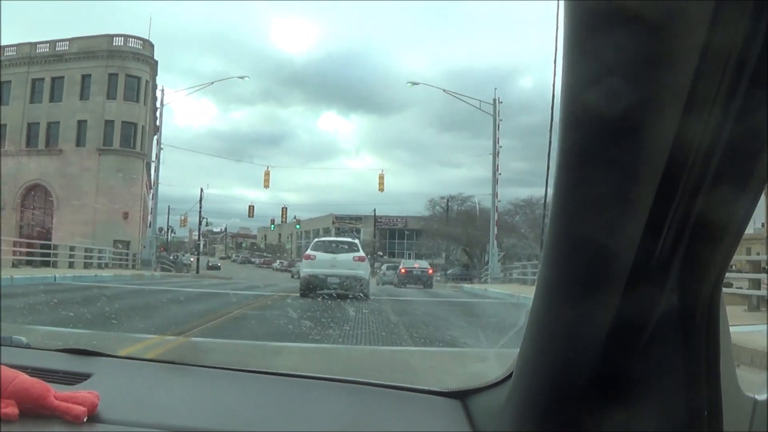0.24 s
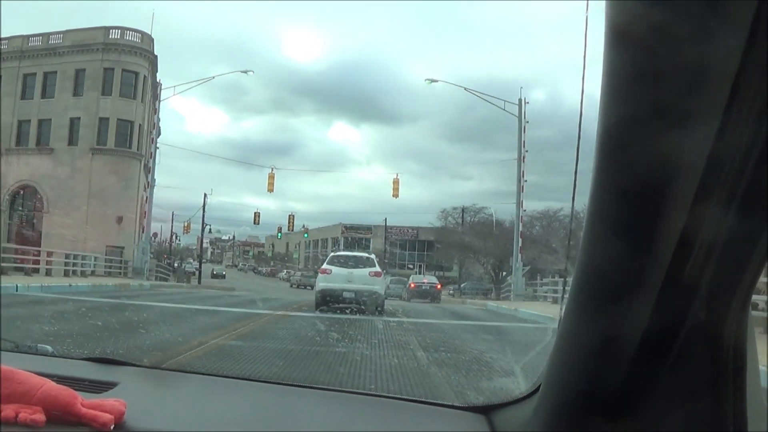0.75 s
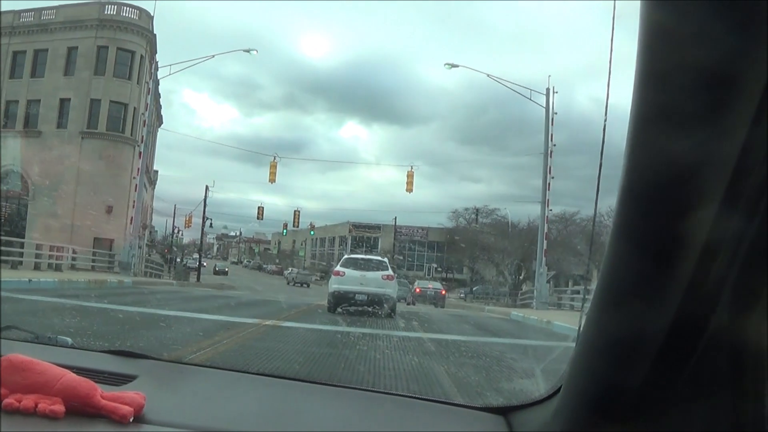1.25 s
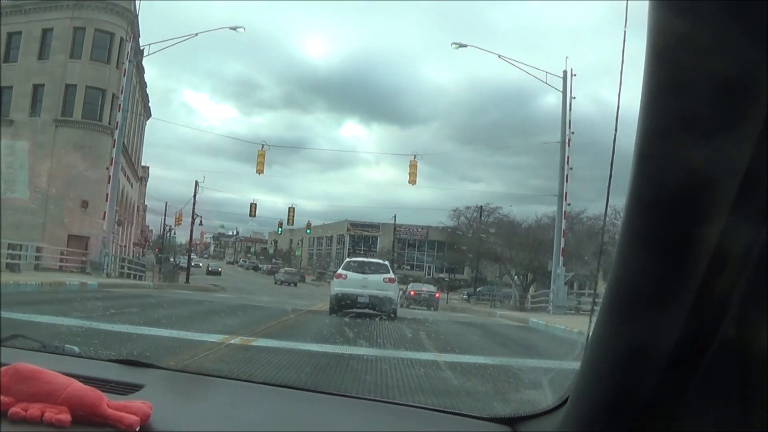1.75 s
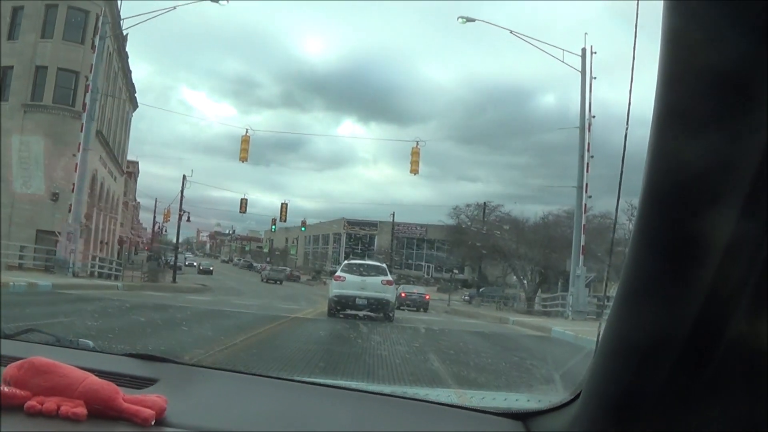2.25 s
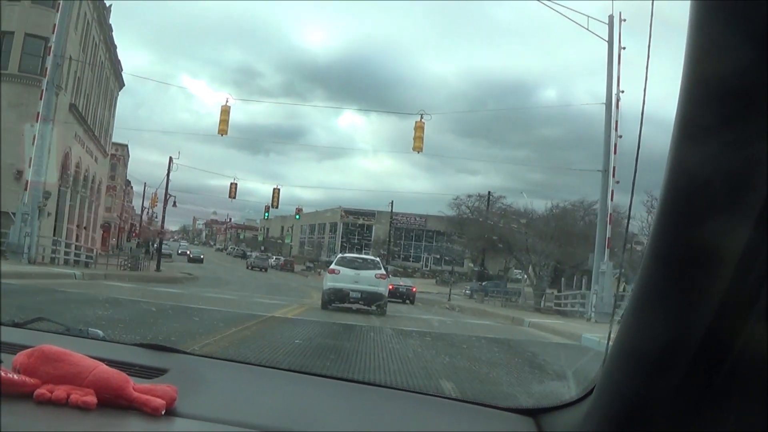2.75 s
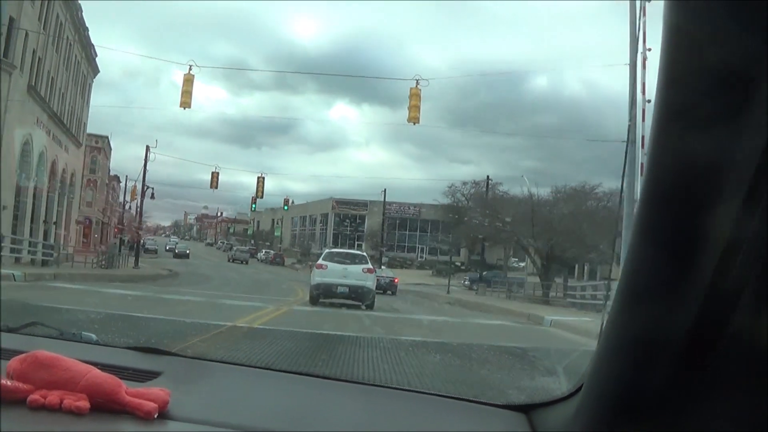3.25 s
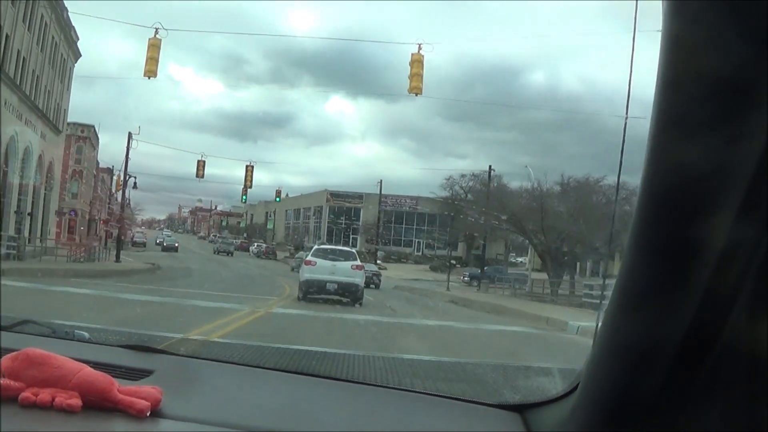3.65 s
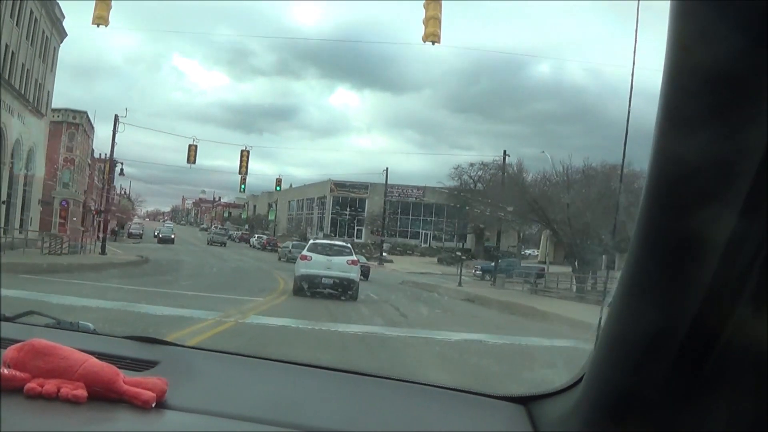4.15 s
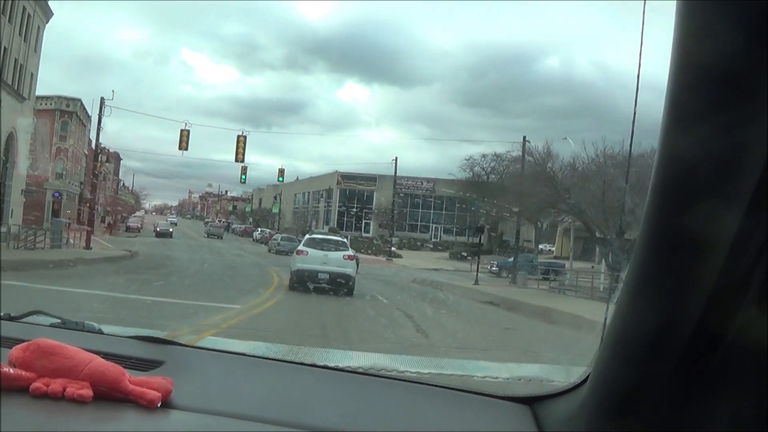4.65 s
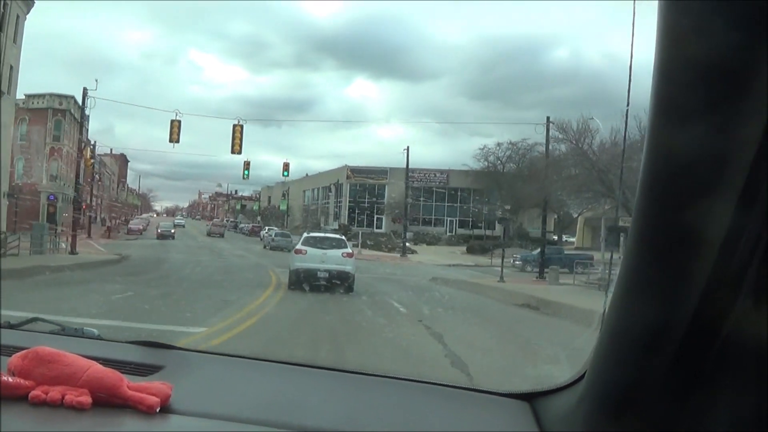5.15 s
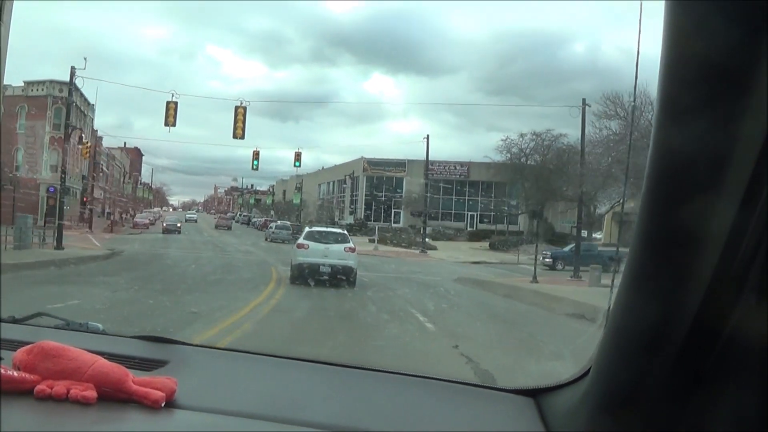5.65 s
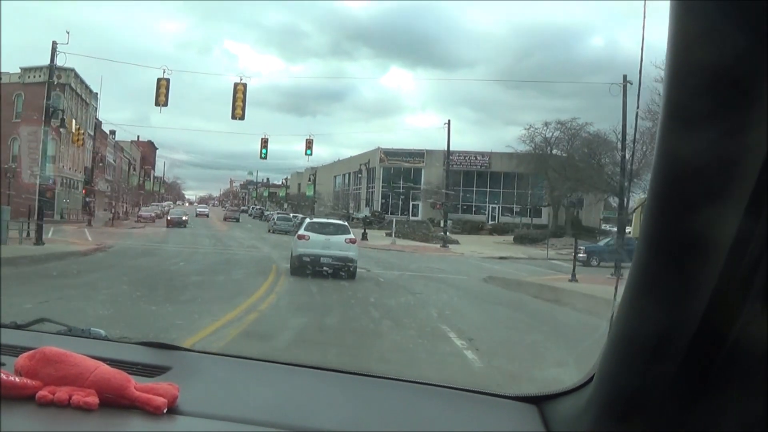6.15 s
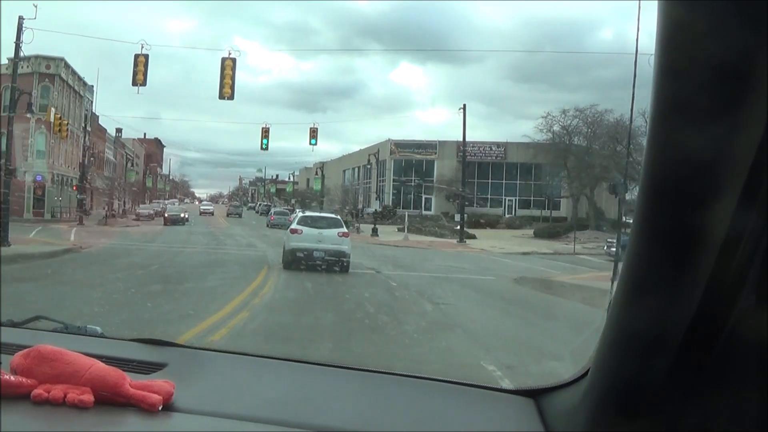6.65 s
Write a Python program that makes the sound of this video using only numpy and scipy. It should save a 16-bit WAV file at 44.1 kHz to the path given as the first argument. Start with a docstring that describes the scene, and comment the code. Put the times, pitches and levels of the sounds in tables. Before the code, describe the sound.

Inside a car driving slowly along a town street, uneven low boom, drumming floor and muffled tyre roar dominate. A low engine hum climbs gradually, then drops after five seconds. Soft thumps cluster in the first two seconds and the last two. Loose dashboard plastic ticks and chatters, densest mid-way. A camera's stereo microphones in the cabin add faint hiss and a very high, thin, throbbing whine.

```python
"""Inside a car rolling slowly through town: the road shakes the body into a boom, a drumming floor and tyre
roar. All three are shaped noise; the engine hums in three wavering sines, the tyres add a faint whine, and
bumps ring panels. Two loose pieces of trim rattle as struck sets of modes, among noise clicks, thumps and rough
little chirps. A camera microphone pair spreads the sound; over it lie hiss and a thin high whine at 15.7 kHz
that buzzes at 60 Hz, and one hears that whine throb about 13 times a second."""
import sys
import numpy as np
from scipy import signal
from scipy.fft import rfft, irfft, next_fast_len
from scipy.io import wavfile

SR = 44100
rng = np.random.default_rng(int(sys.argv[2]) if len(sys.argv) > 2 else 0)


def bounce(signal):
    """Save signal as a 16-bit WAV file at the path given by the first command-line argument."""
    frames = np.transpose(np.atleast_2d(signal))
    limited = np.clip(frames, -1, 1)
    pcm = np.round(limited * 32767).astype(np.int16)
    wavfile.write(sys.argv[1], SR, pcm)


N = 304731

# The engine's pull. Each row: time in seconds, firing rate in Hz, load (level of the first order) in dB,
# second order in dB over the first.
ENGINE_LOAD = [(0, 42.3, -26, -1), (.3, 42.3, -30, -11), (.48, 43.7, -15, -4.5), (.65, 45.16, -40, -14),
               (.9, 46.03, -22, -8), (1.75, 48.84, -34, 2.5), (2.06, 53.24, -12, -17),
               (2.17, 54.34, -26, 0), (2.27, 55.1, -12, -8), (2.4, 55.36, -22.5, -18),
               (2.54, 55.76, -13.5, -11.5), (2.65, 55.97, -24.5, -4), (2.73, 56.1, -17.5, -7),
               (2.96, 56.5, -27, -0.5), (3.12, 57.3, -14.5, -8.5), (3.33, 58.4, -27.5, 1),
               (3.42, 58.26, -19, -7.5), (3.54, 58.86, -16.5, -8), (3.72, 59.47, -29, 2.5),
               (3.88, 59.66, -18.5, -10), (4.0, 59.8, -18.5, -7), (4.1, 60.28, -26.5, 1),
               (4.2, 60.6, -26.5, 10), (4.45, 61.2, -24, 1.5), (4.65, 60.5, -21.5, -4),
               (4.8, 61.8, -26.5, 11), (4.9, 61.5, -36, 10), (5.05, 62.13, -23, 9), (5.19, 62.46, -31, 12),
               (5.3, 54.94, -34, -1.5), (5.75, 48.05, -35, -2), (6.0, 48.2, -18, -7.5), (6.5, 47, -44, -11),
               (6.91, 43.6, -47, -4)]


def amp(db):
    """dB to gain."""
    return 10 ** (np.asarray(db) / 20)


def rms_one(x):
    """Scale to rms 1."""
    return x / np.sqrt(np.mean(x ** 2) + 1e-20)


def in_time(rows):
    """Columns of a curve drawn over time, one value a sample."""
    s, *columns = np.transpose(rows)
    return [np.interp(np.arange(N) / SR, s, column) for column in columns]


def at_hz(points, hz, column=1):
    """A curve over frequency, read on a log-frequency axis."""
    points = np.array(points)
    return np.interp(np.log(hz + 1), np.log(points[:, 0]), points[:, column])


def drift(rate_hz):
    """Slow random wander of rms 1: noise through two equal low-pass poles at rate_hz."""
    step = 40  # computed at a fortieth of the sample rate
    r = np.exp(-2 * np.pi * rate_hz * step / SR)
    noise = rng.standard_normal(N // step + 2002)
    slow = signal.lfilter([1], [1, -2 * r, r * r], noise)[2000:]  # drop the filter's start
    return np.interp(np.arange(N) / step, np.arange(len(slow)), rms_one(slow))


def coloured(spectrum, peaks=()):
    """Two unrelated noises of one colour, with resonances added in power; rms 1."""
    hz = np.fft.rfftfreq(N, 1 / SR)
    power = amp(at_hz(spectrum, hz)) ** 2
    for centre_hz, width_hz, db in peaks:
        power = power + amp(db) ** 2 / (1 + (2 * (hz - centre_hz) / width_hz) ** 2) ** 2
    noise = rng.standard_normal((2, N))
    return rms_one(irfft(rfft(noise) * np.sqrt(power), N))


def ring(pulses, hz, t60):
    """A two-pole resonator: a unit pulse sets a sine of height 1 ringing, 60 dB down after t60 seconds."""
    r, w = amp(-60 / (t60 * SR)), 2 * np.pi * hz / SR
    return signal.lfilter([0, np.sin(w)], [1, -2 * r * np.cos(w), r * r], pulses + 1e-18)


def struck(hits, modes, lag_s, swell_s, spread_db, level_db, crack_db, crack_hz, cycles, scatter_s):
    """Every hit rings all modes, each swelling in, and cracks; bending waves bring low modes later."""
    s, peak_db = np.transpose(hits)
    strength, late = rng.standard_normal((2, len(hits), len(modes)))
    out = np.zeros(N)
    for k, (hz, db, t60, *slow_swell) in enumerate(modes):
        # the delay is half lag_s at 1 kHz and nothing at 4 kHz, give or take scatter_s
        arrival = s + lag_s * (np.sqrt(1000 / hz) - .5) + scatter_s * late[:, k]
        at = np.clip(arrival * SR, 0, N - 1).astype(int)
        pulses = np.zeros(N)
        pulses[at] = amp(peak_db + db + level_db + spread_db * strength[:, k]) * (-1) ** k
        # a short ring taken from a long one gives a soft onset
        swell_t60 = max([swell_s * 1000 / hz, *slow_swell])
        out += ring(pulses, hz, min(t60, cycles / hz)) - ring(pulses, hz, swell_t60)
    # the contact itself cracks: broad noise that dies in about 10 ms and grows faster than the blow
    pulses = np.zeros(N)
    pulses[(s * SR).astype(int)] = amp(1.38 * (peak_db + 26) + crack_db)
    fade = signal.lfilter([1], [1, -np.exp(-1 / (0.0096 * SR))], pulses + 1e-18)
    band = signal.butter(2, [crack_hz / 3, crack_hz * 1.8], "band", fs=SR, output="sos")
    return out + fade * rms_one(signal.sosfilt(band, rng.standard_normal(N)))


def road():
    """Rough tarmac drives the boom, the floor pan with its panels, and the tread roar; all surge unevenly."""
    # Road excitation. Each row: time in seconds, boom, floor pan and tyre roar levels in dB.
    excitation = [(0.0, -27.5, -25.5, -33.5), (0.5, -21.5, -20.5, -32.5), (0.67, -37, -19, -32),
                  (0.79, -21, -15, -33), (0.85, -19, -22.5, -33.5), (1.23, -27, -20.5, -33.5),
                  (1.29, -20, -25.5, -35), (1.44, -18, -21.5, -33), (1.73, -18, -17, -31.5),
                  (1.81, -42, -14.5, -30.5), (1.96, -16.5, -18, -32.5), (2.23, -29, -20.5, -32.5),
                  (3.31, -18, -21, -33.5), (3.5, -34, -21.5, -33.5), (3.56, -21, -18, -32.5),
                  (4.0, -20, -20, -32), (4.22, -23.5, -19, -34), (4.85, -18.5, -21.5, -33.5),
                  (4.98, -28, -18.5, -35), (5.1, -32, -30, -38), (5.24, -16, -19.5, -32.5),
                  (5.37, -21.5, -29, -37), (5.74, -20, -22, -33.5), (6.16, -27, -21.5, -34.5),
                  (6.24, -26.5, -23, -32), (6.27, -26, -18, -33), (6.33, -30, -27, -37),
                  (6.76, -27.5, -27.5, -36.5), (6.89, -27, -14.5, -27.5), (6.91, -40, -26.5, -32)]
    # Suspension and cabin boom, drumming floor, tread roar through the body.
    # Each row: frequency in Hz, relative level per Hz in dB.
    boom_colour = [(8.8, -48), (15, -12), (38, 5), (70, -3.5), (120, -12), (160, -53), (260, -120)]
    pan_colour = [(32, -33), (55, -2), (108, 2), (157, -4.5), (175, -1.5), (200, -4.5), (320, -16),
                  (420, -41), (700, -120)]
    tyre_colour = [(120, -63), (200, -8), (334, -11), (513, -12.5), (603, -17), (790, -16), (1060, -26),
                   (1180, -26), (1870, -36), (2420, -37), (5000, -63.5), (6500, -83), (11000, -120)]
    # Slow body mode added to the boom, then panel modes added to the floor pan.
    # Each row: centre in Hz, width in Hz, level in dB on the scale of that colour.
    body_bounce = [(26.5, 11, 7)]
    panels = [(86, 11, 0.5), (152.7, 14.7, 3.5), (175, 3.6, 1.5)]
    lumps_db = 1.5  # random surges of each layer
    boom_db, pan_db, tyre_db = in_time(excitation)
    surge = drift(5.4)
    boom = amp(boom_db + lumps_db * drift(3.2)) * coloured(boom_colour, body_bounce)
    pan = amp(pan_db + lumps_db * surge) * coloured(pan_colour, panels)
    # the roar shares a little of the floor's surge
    tyres = amp(tyre_db + lumps_db * (0.13 * surge + drift(21.0))) * coloured(tyre_colour)
    return boom + pan + tyres


def engine():
    """The first three orders of the firing rate as sines that waver in level and together in pitch."""
    third_db = -10.5  # over the first order
    waver_db, waver_hz, speed_waver = 2.0, 7.0, .008
    firing_hz, load_db, second_db = in_time(ENGINE_LOAD)
    turn = 2 * np.pi * np.cumsum(firing_hz * (1 + speed_waver * drift(3.68))) / SR
    hum = np.zeros(N)
    for order, db in enumerate([0, second_db, third_db], start=1):
        tone = amp(waver_db * drift(waver_hz)) * np.sin(order * turn)
        hum += amp(load_db + db) * rms_one(tone)
    return hum


def tyre_whine():
    """The tyres' faint whine: a sine that glides and flutters in pitch and wavers in level."""
    # Each row: time in seconds, pitch in Hz, level in dB.
    glide = [(.5, 1160, -61), (.8, 1151, -53), (1.3, 1138, -51), (1.6, 1159, -50), (2.0, 1160, -89),
             (2.4, 1232, -60), (2.9, 1211, -70)]
    waver_db = 3.0
    whine_hz, whine_db = in_time(glide)
    phase = 2 * np.pi * np.cumsum(whine_hz * (1 + 0.0026 * drift(28))) / SR
    return amp(whine_db + waver_db * drift(15)) * np.sin(phase)


def bumps():
    """Each bump is a soft push: one body panel swells in over about a cycle and dies away."""
    # Each row: start in seconds, level in dB, panel pitch in Hz.
    pushes = [(0.371, -14, 111), (.405, -16, 43.8), (.44, -25, 80.6), (0.541, -16, 175),
              (0.595, -2.5, 154.6), (.69, -10, 138.5), (0.764, -5, 77.5), (.84, -11, 42), (.93, -10, 54.6),
              (1.11, -12.5, 128), (1.19, -10, 47.7), (1.22, -18, 89.6), (1.574, -9, 161),
              (1.762, -17, 203.6), (1.799, -16, 105.3), (1.9, -11.5, 83), (3.12, -15.5, 183),
              (3.56, -16, 188), (5.19, -7.5, 39.27), (5.202, -8.5, 84.6), (5.623, -7, 169.5),
              (5.699, -11, 180), (5.725, -14, 143), (5.86, -6, 48), (5.96, -8.5, 113.4),
              (5.999, -10, 170.9), (6.235, -7, 45.5), (6.244, -10.5, 104), (6.829, -14.5, 145.6),
              (6.874, -15.5, 221.4)]
    t60_s = 0.28
    out, t = np.zeros(N + SR), np.arange(SR // 2) / SR
    for s, db, hz in pushes:
        shape = (1 - np.exp(-t * hz / 0.9)) * amp(-60 * t / t60_s)
        out[int(s * SR):][:len(t)] += amp(db) * shape * np.sin(2 * np.pi * hz * t)
    return out[:N]


def chatter():
    """Faint random taps of the trim, denser under engine load, as rows of seconds and dB."""
    full_load_per_s, level_db, spread_db = 20, -47, 1.5
    load_db = in_time(ENGINE_LOAD)[1]
    chance = full_load_per_s * amp(load_db - load_db.max()) / SR
    at = np.flatnonzero(rng.random(N) < chance)
    return list(zip(at / SR, level_db + spread_db * rng.standard_normal(len(at))))


def dashboard_trim():
    """Loose trim taps and chatters; foam behind it stops every mode within 90 cycles."""
    # Each row: time in seconds, strength of the tap in dB.
    taps = [(0.0543, -29), (0.0957, -32), (0.1221, -38.5), (0.1476, -43), (0.2897, -37), (0.447, -30),
            (0.6906, -47), (0.864, -26.5), (0.8899, -32), (0.9752, -41), (1.0281, -33), (1.052, -35),
            (1.0964, -46), (1.2057, -39), (1.2585, -34), (1.3946, -32), (1.4172, -35), (1.4418, -33),
            (1.4671, -41), (1.5209, -47), (1.5849, -27.5), (1.6118, -23.5), (1.7784, -31.5),
            (1.8306, -32.5), (1.8647, -40), (1.8861, -30.5), (1.9066, -28.5), (1.9829, -23), (2.0034, -36),
            (2.0355, -22), (2.0567, -28), (2.0748, -32), (2.105, -40), (2.1259, -29.5), (2.149, -33),
            (2.1796, -27.5), (2.2024, -29.5), (2.2576, -33), (2.2922, -30.5), (2.3064, -33.5),
            (2.329, -30.5), (2.3431, -34), (2.3584, -37), (2.383, -29), (2.397, -29), (2.4309, -30.5),
            (2.4558, -27), (2.4674, -32.5), (2.488, -38), (2.5052, -36), (2.5229, -31.5), (2.5453, -35),
            (2.5577, -31), (2.591, -40), (2.615, -28.5), (2.6314, -33), (2.6632, -37), (2.6843, -34),
            (2.6974, -36), (2.7666, -42), (2.7891, -36), (2.8403, -32), (2.8524, -41), (2.9071, -31.5),
            (2.9294, -46), (2.9617, -42), (3.039, -36), (3.0622, -42), (3.0894, -44), (3.1103, -46),
            (3.1293, -46), (3.1986, -30.5), (3.2294, -33.5), (3.2625, -37), (3.3263, -39), (3.3685, -46),
            (3.4131, -33), (3.4319, -37), (3.483, -37.5), (3.5359, -29), (3.5673, -33.5), (3.5872, -43),
            (3.6217, -28), (3.6322, -34), (3.686, -29.5), (3.7369, -33.5), (3.7871, -42), (3.8402, -33),
            (3.913, -28.5), (3.9429, -47), (3.9775, -32), (3.9958, -33.5), (4.0084, -34), (4.0267, -40),
            (4.0455, -29.5), (4.0613, -32), (4.0947, -32), (4.144, -34), (4.2288, -31.5), (4.2547, -36.5),
            (4.2786, -36.5), (4.3435, -47), (4.3705, -30.5), (4.3964, -31.5), (4.4268, -50), (4.4493, -42),
            (4.4806, -25.5), (4.5428, -34), (4.5585, -33.5), (4.5735, -43), (4.6272, -26), (4.6571, -33.5),
            (4.7066, -29), (4.7204, -43), (4.776, -41), (4.8065, -27.5), (4.8509, -38), (4.8688, -34.5),
            (4.8973, -36.5), (4.9297, -24.5), (4.9979, -38.5), (5.0291, -28), (5.0739, -42.5),
            (5.3028, -34.5), (5.3323, -41), (5.4126, -43), (5.5692, -36.5), (5.8411, -36), (5.8641, -33.5),
            (5.9589, -27), (6.0701, -47), (6.318, -31), (6.3458, -31.5)]
    # Each row: mode in Hz, relative level in dB, t60 in seconds,
    # and for one that swells in slowly the t60 of the swell in seconds.
    modes = [(748, 5.8, 0.034), (996, -0.5, 0.02), (1203, 1.5, 0.031), (1433, -4, 0.037),
             (1794, -2.5, 0.02), (2030, -0.5, 0.028), (2366, -2.5, 0.022), (2610, -2, 0.019),
             (2990, -8, 0.02), (3000, -13.5, 0.017), (3640, 1.77, .028, .015), (3600, -32, 0.025),
             (3000, -16.5, 0.019), (4850, -39, .02), (5660, -36, .02), (5770, -30, .02)]
    return struck(taps + chatter(), modes, lag_s=0.0043, swell_s=0.004, spread_db=1.5, level_db=-3,
                  crack_db=-42.5, crack_hz=2220, cycles=90, scatter_s=.00003)


def loose_part():
    """A hollower loose part knocks; damping stops its modes within 60 cycles."""
    # Each row: time in seconds, strength of the knock in dB.
    knocks = [(.5182, -30.5), (.605, -33.5), (.9822, -40), (1.6873, -33.5), (2.7261, -43), (2.8154, -43),
              (3.2879, -32.5), (3.4622, -40.5), (3.5573, -42), (5.2727, -40.5), (5.6359, -43),
              (5.7205, -40), (5.8175, -37), (5.9051, -36.5), (5.9959, -31), (6.0891, -39.5), (6.1796, -37)]
    # Each row: mode in Hz, relative level in dB, t60 in seconds.
    modes = [(589, 7.5, 0.034), (779, -12, 0.088), (943, -3, 0.035), (1223, 2, 0.017), (1307, -2.5, 0.076),
             (1618, -8, 0.048), (1927, -10.5, 0.094), (2053, -10.5, 0.071), (2270, -15, 0.044),
             (2740, -18, 0.06), (2940, -25.5, 0.085), (3670, -36, 0.026), (3890, -31, 0.032),
             (4660, -20.5, 0.09), (5030, -23, 0.019), (5550, -24, 0.054), (6380, -27, 0.09)]
    return struck(knocks, modes, lag_s=0.00327, swell_s=0.014, spread_db=0.0, level_db=12.5,
                  crack_db=-32.5, crack_hz=2200, cycles=60, scatter_s=.0003)


def clicks():
    """Dry clicks, scrapes and thumps: short bursts of band-passed noise, the lower ones dying more slowly."""
    # Each row: start in seconds, level in dB, centre in Hz, width in octaves.
    bursts = [(0.051, -33, 5930, 0.74), (.094, -36, 2260, 0.34), (.398, -23, 386, 1.1),
              (.401, -46, 1760, 0.65), (0.416, -29.5, 2240, 0.33), (.465, -42, 5500, 1.2),
              (.822, -44, 4900, .58), (1.539, -39, 1592, 0.24), (1.557, -25.5, 328, 0.9),
              (1.607, -23, 396, 1.9), (1.76, -27.5, 552, 0.49), (1.849, -31, 475, .7),
              (1.869, -24.5, 330, 0.97), (3.291, -38, 8040, 1.5), (3.648, -34, 1900, 0.9),
              (3.655, -38, 2290, 0.61), (3.6626, -32.5, 2440, 0.71), (5.225, -40, 5820, 1.3),
              (5.259, -34.5, 6380, 1.6), (5.622, -25, 630, 0.98), (5.639, -30, 500, .8),
              (5.903, -23, 328, 1.44), (6.241, -32.5, 5360, 1.5), (6.267, -38, 5810, 0.82),
              (6.724, -43, 3500, 1.5), (6.823, -46, 1170, 3.4), (6.833, -26, 320, 1.3),
              (6.854, -40, 1936, 0.79), (6.877, -30, 1790, 1.2), (6.877, -20.5, 364, 1.14),
              (6.905, -26, 2360, 0.51)]
    t60_at_1khz_s, t60_slope, longest_t60_s = 0.099, -1.01, 0.13
    out, t = np.zeros(N + 4096), np.arange(4096) / SR
    for s, db, hz, octaves in bursts:
        half_width = 2 ** (octaves / 2)
        edges_hz = [hz / half_width, min(hz * half_width, 15500)]
        band = signal.butter(2, edges_hz, "band", fs=SR, output="sos")
        noise = rms_one(signal.sosfilt(band, rng.standard_normal(4096)))
        t60_s = min(t60_at_1khz_s * (hz / 1000) ** t60_slope, longest_t60_s)
        shape = np.minimum(t / 0.002, 1) * amp(-60 * t / t60_s)
        out[int(s * SR):][:4096] += amp(db) * shape * noise
    return out[:N]


def chirps():
    """Brief high notes, roughened by a random walk of phase, in even runs that swell towards the middle."""
    # Each row: start in seconds, length of the run in seconds, level in dB, pitch in Hz.
    runs = [(0.249, 0.022, -47, 7470), (0.903, 0.16, -49, 8000), (5.346, 0.29, -46, 7450),
            (6.107, 0.064, -46, 7700)]
    every_s, spread_hz = .0458, 110
    out, t = np.zeros(N + 2048), np.arange(2048) / SR
    shape = t / 0.0074 * np.exp(1 - t / 0.0029)
    for start, length, db, hz in runs:
        count = int(round(length / every_s)) + 1
        for k, swell in enumerate(np.hanning(count + 2)[1:-1]):
            noise = rng.standard_normal(2048)
            note_hz = hz + spread_hz * noise[0]
            note = np.sin(2 * np.pi * note_hz * t + 0.09 * np.cumsum(noise))
            out[int((start + k * every_s) * SR):][:2048] += amp(db) * swell * shape * note
    return out[:N]


def cabin(x):
    """Dense short reflections off glass and seats: decaying noise, an unrelated pattern for each side."""
    t60_s, level_db = 0.085, -8
    t = np.arange(int(.12 * SR)) / SR
    fade = amp(-60 * t / t60_s) * np.minimum(t / 0.00099, 1)
    echoes = rng.standard_normal((2, len(t))) * fade
    echoes /= np.sqrt(np.sum(echoes ** 2, axis=1, keepdims=True))
    return amp(level_db) * signal.fftconvolve(x[None], echoes, axes=1)[:, :N]


def hiss_gain():
    """The moving level of the hiss, as a gain."""
    # Each row: time in seconds, level in dB.
    levels = [(0, -57), (1.38, -57.5), (1.81, -54.5), (2.02, -61), (4.39, -60.5), (6.25, -59), (6.72, -60),
              (6.91, -53.5)]
    return amp(in_time(levels)[0])


def hiss():
    """Two unrelated steady noises, brightest around 3 kHz."""
    # Each row: frequency in Hz, relative level per Hz in dB.
    colour = [(1800, -21), (3000, -3.5), (4800, -9), (9000, -13.5), (14500, -16), (15800, -23.5)]
    return coloured(colour)


def scan_whine():
    """The camera's line-scan whine, a high sine with a 60 Hz buzz; one also hears a throb of 13 a second."""
    scan_hz, frame_hz, buzz_db = 15734.3, 59.94, -15
    throb_hz, throb_depth = 13.01, .48
    t = np.arange(N) / SR
    harmonics = sum(np.cos(2 * np.pi * k * frame_hz * t) / np.sqrt(k) for k in range(1, 7))
    buzz = 1 + amp(buzz_db) * harmonics
    throb = 1 - throb_depth * np.cos(2 * np.pi * throb_hz * (t + .0142))
    return buzz * throb * np.sin(2 * np.pi * scan_hz * t)


def microphones(common, apart, direct):
    """The right capsule leads in phase; diffuse sound has a part that differs in sign between the sides."""
    # Each row: frequency in Hz, left-right likeness from 0 to 1, radians the right leads.
    pair = [(25, 0.99, 0.7), (61, 1, 0.74), (125, 0.99, 1.22), (188, 0.93, 1.48), (324, 0.86, 1.56),
            (480, 0.98, 1.54), (685, 0.91, 1.48), (960, 0.9, 0.93), (1480, 0.78, 0.91), (2190, 0.5, 0.49),
            (3170, 0.72, 0.41), (4530, 0.8, 0.82), (9050, 1, 0.47), (14000, 0.98, 0.0)]
    # Each row: frequency in Hz, left over right in dB.
    balance = [(60, 0.5), (150, -0.5), (380, -0.5), (950, -2.5), (2380, 0), (5980, 0), (15000, 0)]
    edge = 4096  # mirrored margin around the sound
    size = next_fast_len(N + 2 * edge)
    margins = ((0, 0), (edge, size - N - edge))
    padded = np.pad([common, apart, direct], margins, "reflect", reflect_type="odd")
    common, apart, direct = rfft(padded)
    hz = np.fft.rfftfreq(size, 1 / SR)
    alike = np.clip(at_hz(pair, hz), 0, 1)
    # half the lead and half the level difference go to each side
    lead = np.exp(.5j * at_hz(pair, hz, column=2)) / amp(at_hz(balance, hz) / 2)
    mid = common * np.sqrt((1 + alike) / 2) + direct
    side = apart * np.sqrt((1 - alike) / 2)
    return irfft(np.array([(mid + side) / lead, (mid - side) * lead]), size)[:, edge:edge + N]


def scene():
    """All sources as they reach the two capsules."""
    rattles = dashboard_trim() + loose_part() + clicks() + chirps()
    direct = engine() + tyre_whine() + bumps() + rattles
    gain = hiss_gain()
    common, apart = road() + gain * hiss()
    echoes = cabin(rattles) * [[1], [-1]]
    scan = gain * amp(-4) * scan_whine()  # rises and falls with the hiss
    return microphones(common, apart, direct) + echoes + scan


def record(dry):
    """Peaks are pressed under a firm ceiling, then a steep low-pass cuts the top."""
    ceiling, cutoff_hz = .55, 15790
    held = dry / (1 + (dry / ceiling) ** 4) ** .25
    cut = signal.ellip(12, .5, 70, cutoff_hz, fs=SR, output="sos")
    return signal.sosfilt(cut, held)


dry = scene()
out = record(dry)
bounce(out)
```